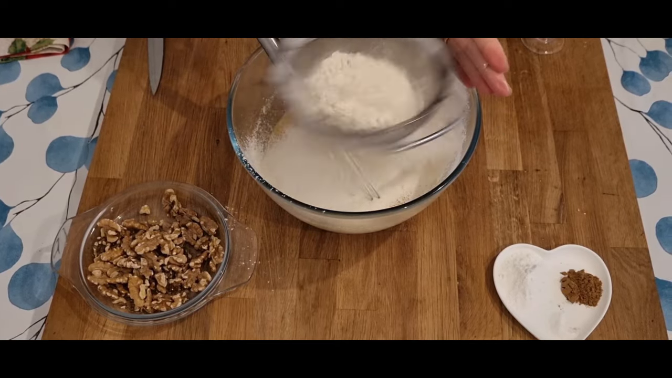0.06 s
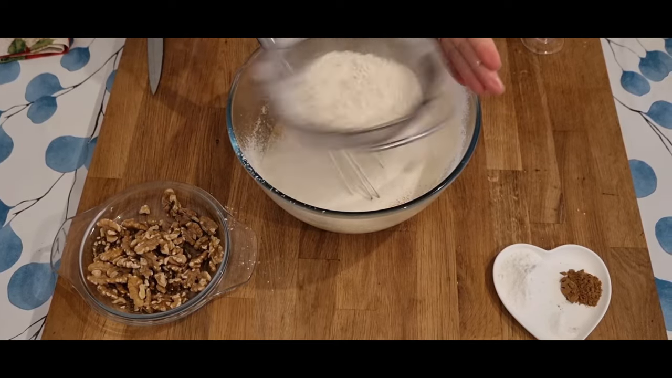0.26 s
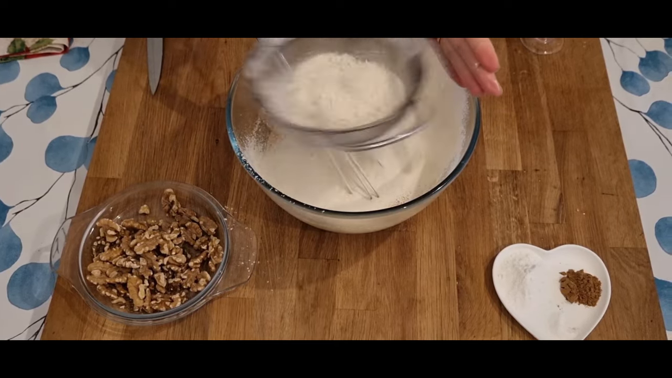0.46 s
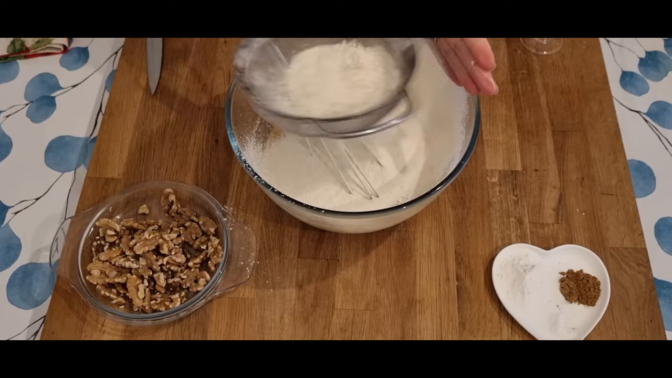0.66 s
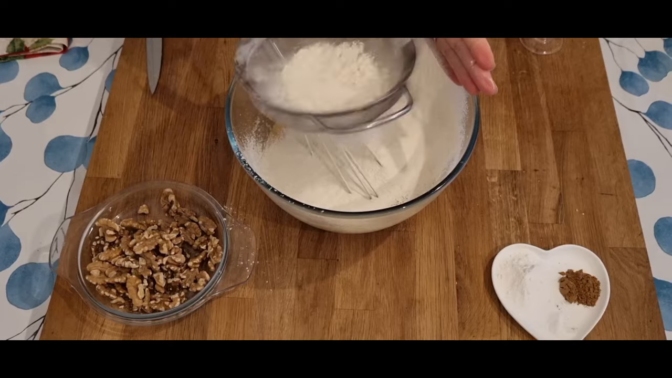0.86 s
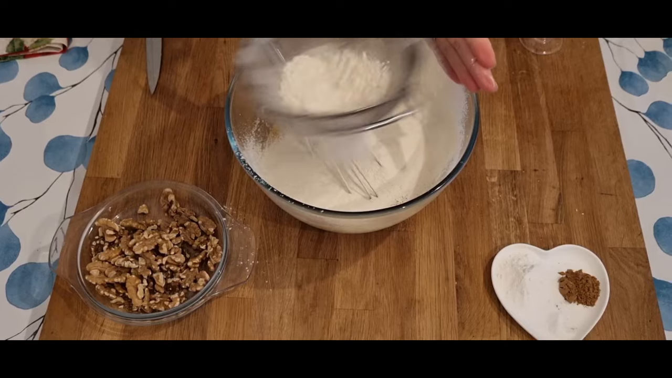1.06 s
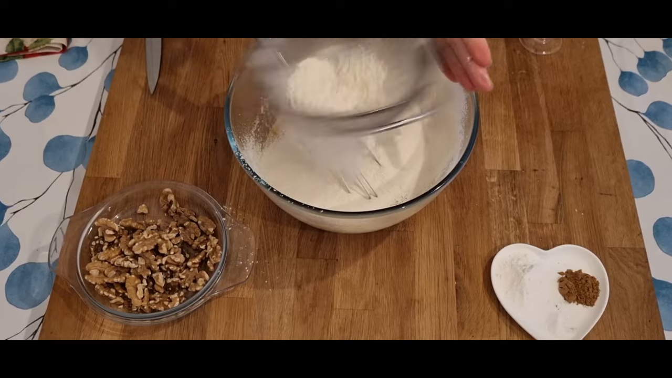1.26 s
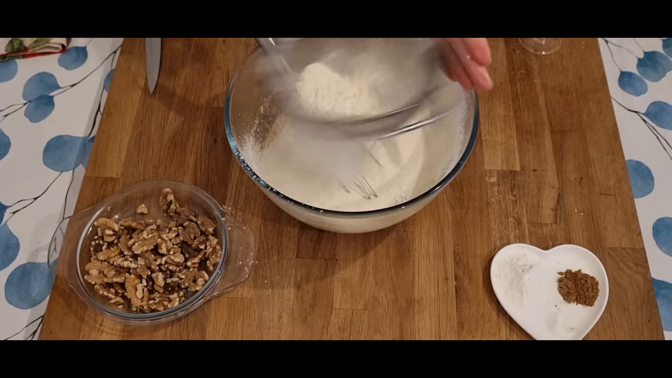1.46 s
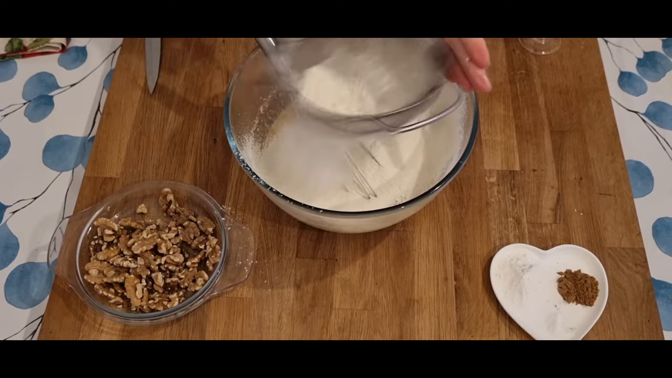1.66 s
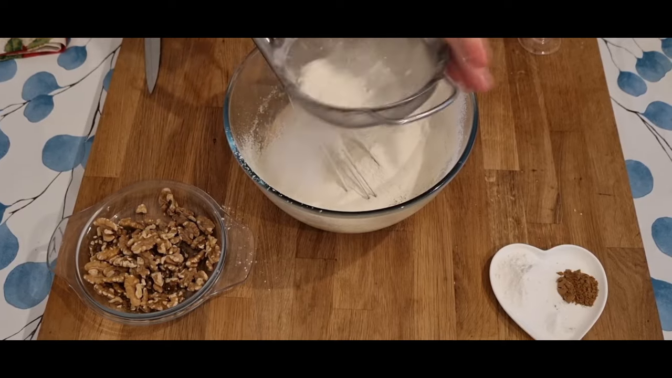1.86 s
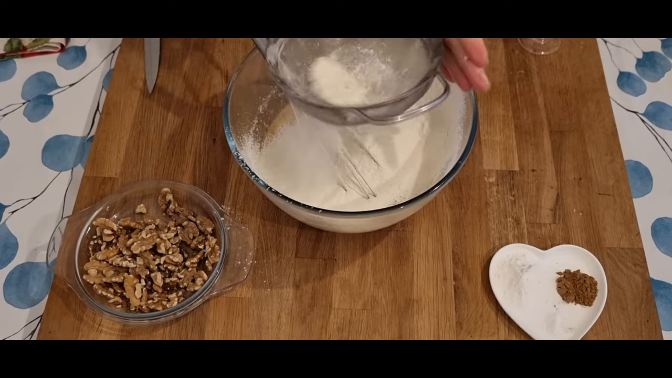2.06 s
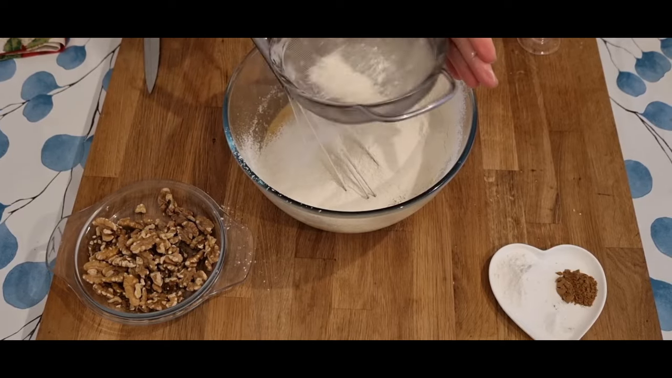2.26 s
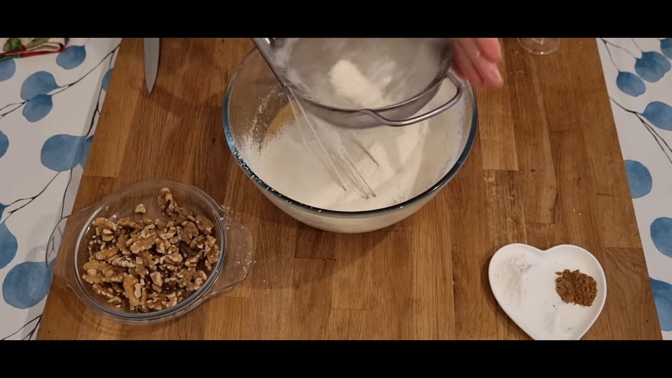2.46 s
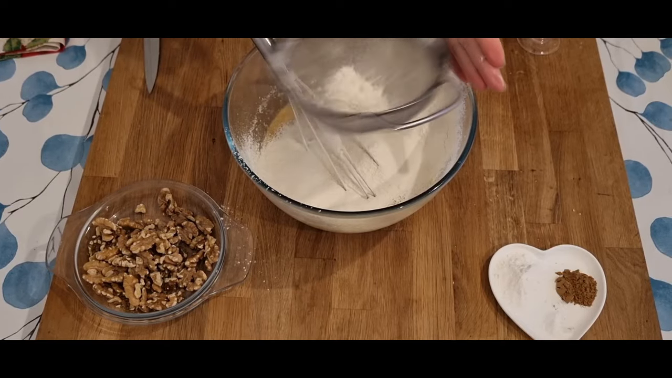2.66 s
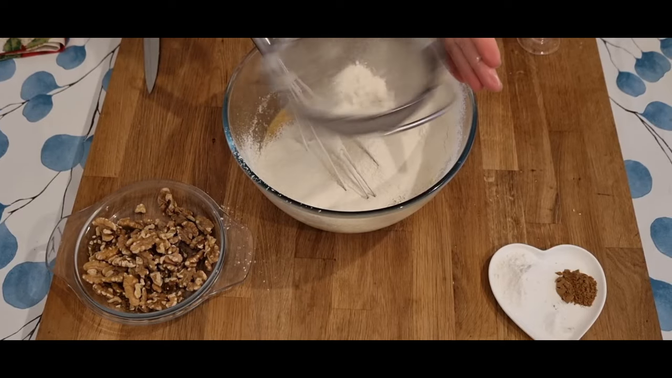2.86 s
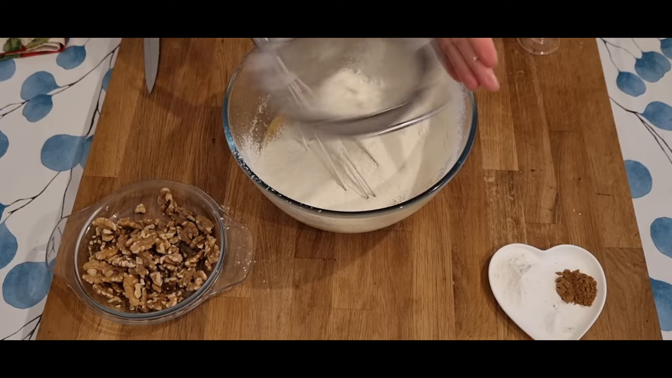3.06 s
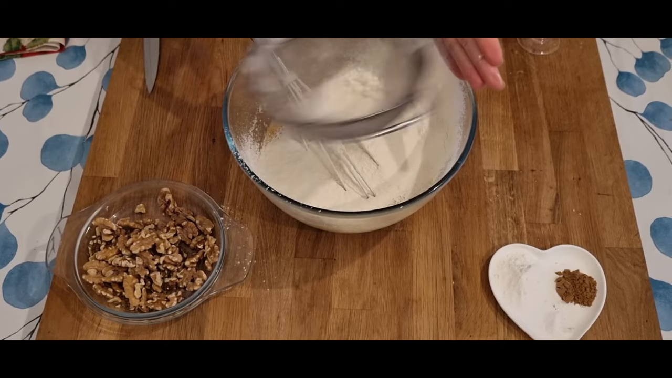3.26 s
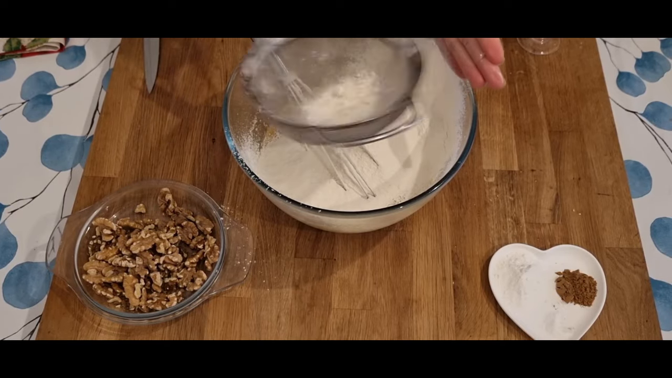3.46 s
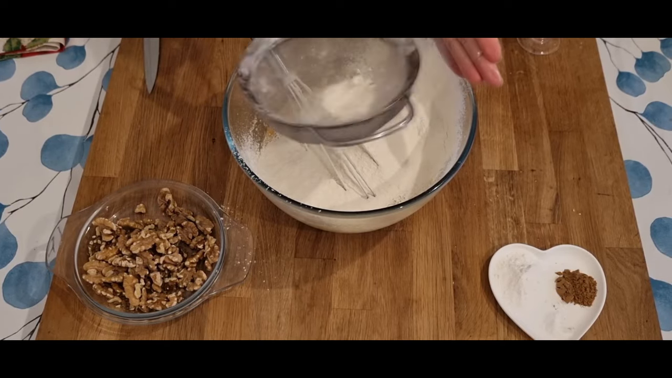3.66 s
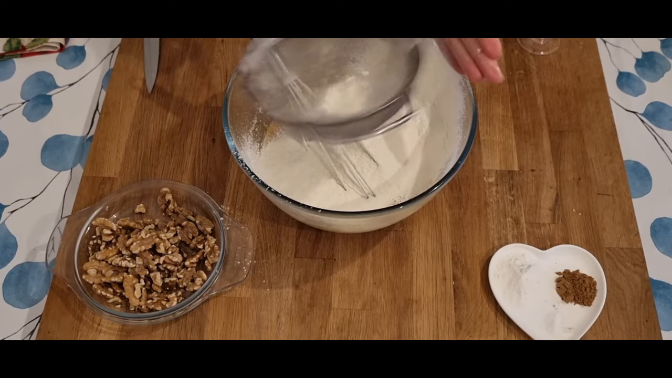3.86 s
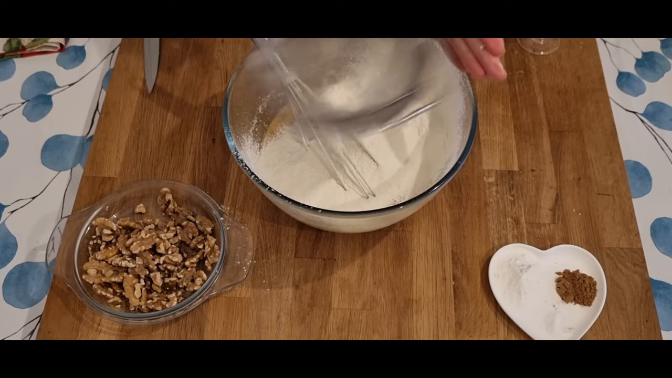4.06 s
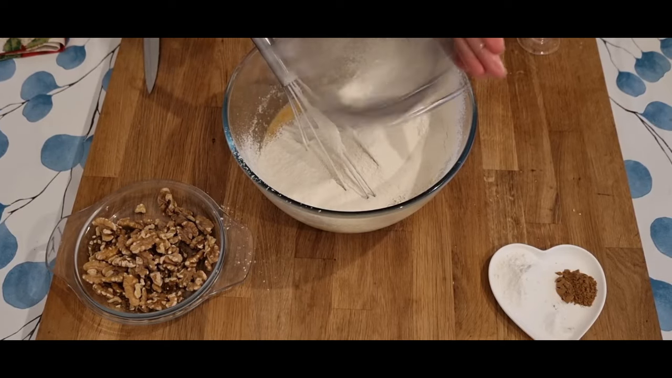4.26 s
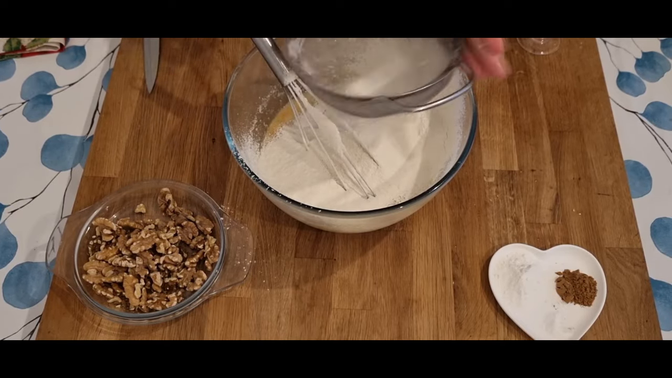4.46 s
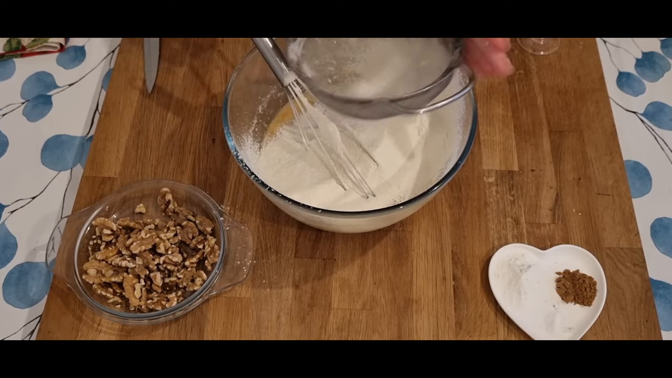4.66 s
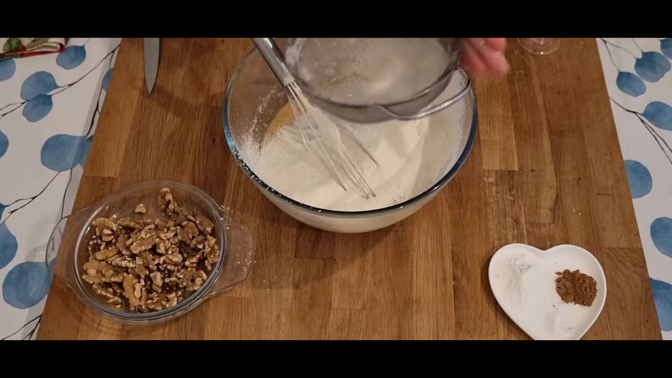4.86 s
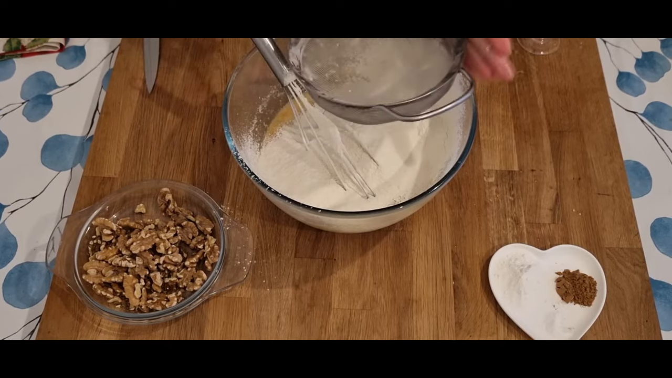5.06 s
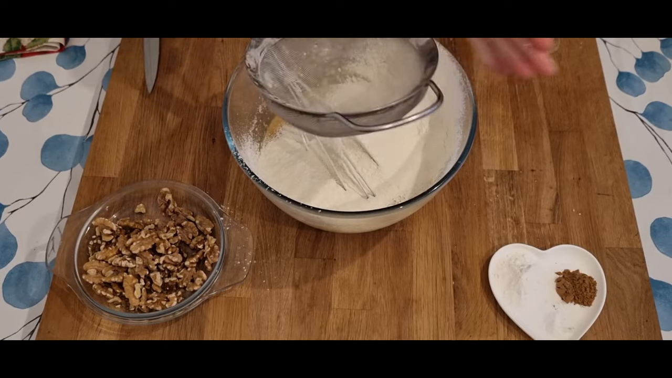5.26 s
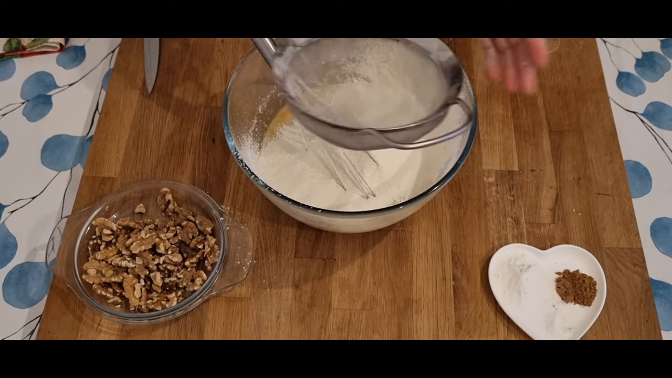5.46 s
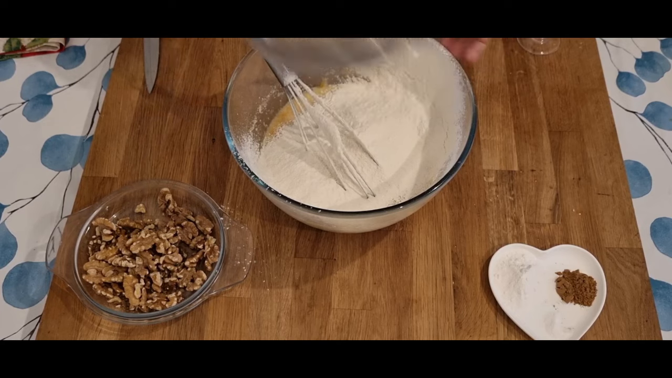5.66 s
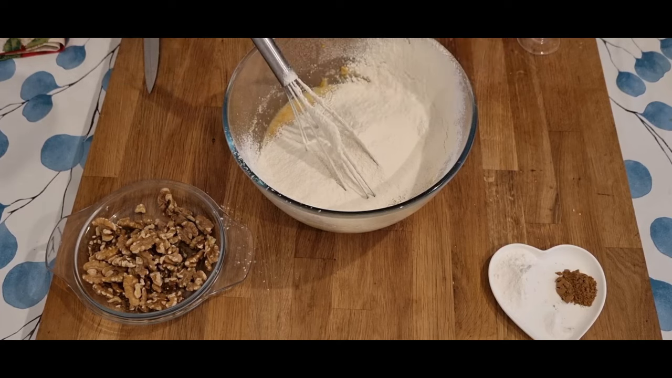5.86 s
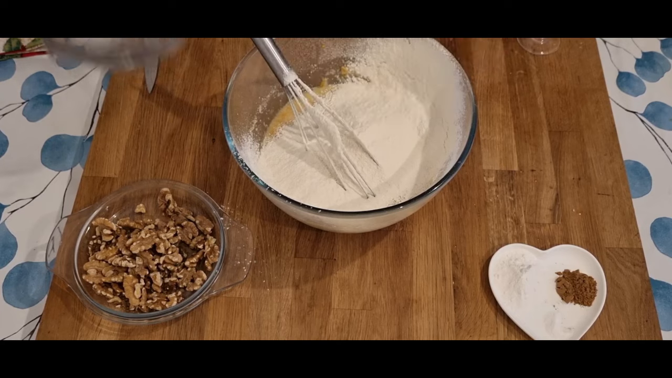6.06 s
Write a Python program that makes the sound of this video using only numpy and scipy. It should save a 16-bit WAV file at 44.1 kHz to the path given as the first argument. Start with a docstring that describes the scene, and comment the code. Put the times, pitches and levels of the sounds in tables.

```python
"""Sifting flour by hand

A metal sieve of flour is knocked against a palm above a glass bowl, in short runs of about five knocks a second.
Each knock is a few milliseconds of rim chatter, coloured by rim and mesh, with ringing modes of the wire frame.
The table throws it back after a short delay, and the kitchen rings out as noise dying band by band.
Flour hisses faintly through the mesh as grainy noise; an appliance hums in sines and whirs in narrow noise bands."""
import sys
import numpy as np
from scipy import signal
from scipy.fft import rfft, irfft
from scipy.io import wavfile
from scipy.ndimage import uniform_filter1d

SR = 44100
rng = np.random.default_rng(int(sys.argv[2]) if len(sys.argv) > 2 else 0)


def unload_wav(signal):
    """Save mono or channel-first audio to the path in sys.argv[1] as 16-bit WAV at rate SR, clipped to [-1, 1]."""
    wavfile.write(
        sys.argv[1],
        SR,
        np.round(np.clip(np.atleast_2d(signal).T, -1, 1) * 32767).astype(np.int16),
    )


N = 270093

# steady room noise: pitch_hz, level_db (per Hz)
AIR_SPECTRUM = [(20, -100), (45, -94), (65, -83.5), (120, -81.5), (170, -92), (230, -86.5), (450, -90),
                (590, -91.5), (730, -93), (830, -100), (1300, -100), (1900, -104.5), (5500, -115),
                (8000, -132)]
# how alike the room noise is on both sides: pitch_hz, likeness (1 = identical)
AIR_LIKENESS = [(50, 1), (150, 0.94), (300, 0.72), (700, 0.19), (3000, 1)]
# balance of the room noise: pitch_hz, left_over_right_db
AIR_BALANCE = [(100, -0.5), (300, -3.5), (2000, -0.5), (5000, -9)]
# narrow bands in which the appliance whirs: pitch_hz, width_hz, level_db (per Hz)
WHIR_BANDS = [(230, 7.8, -83), (581, 6.5, -81), (1520, 7, -87.5)]
# steady lines of the appliance: pitch_hz, level_db
HUM_LINES = [(60.3, -85), (90.6, -71), (100.2, -61.5), (120.8, -54), (130.4, -77), (211.4, -78.5),
             (221.0, -65.5), (251.2, -73.5), (281.4, -75), (302.0, -76), (341.8, -73), (402.2, -76.5),
             (634.4, -72.5), (663.5, -77.5), (713.5, -77)]

# tone of flour sliding over the mesh: pitch_hz, relative_level_db
FLOUR_TONE = [(500, -20), (2500, 0.5), (6500, 3), (9000, -4.5), (15000, -3.5)]
# hiss with the sieve full and nearly empty, and the time constant of the emptying
FULL_DB, EMPTY_DB, EMPTYING_S = -56.5, -87.5, 0.98
# the flour hiss starts to fade, with this time constant, before the last knocks
HISS_FADES_S, HISS_FADE_TIME_S = 4.7, .2

# the shake swings every 0.19 s; some swings miss the palm and two only brush it
# knocks: start_s, strength_db, zing_db (extra zing of the mesh)
KNOCK_TIMES = [(-0.082, -6, 11.0), (0.108, -0.5, 0.5), (0.297, -6.5, -2.5), (0.6717, -3.5, -1.5),
               (1.414, -1.5, -3.5), (1.6054, -0.5, -1.5), (1.7948, 0.5, -1), (1.982, 0.0, -2),
               (2.353, -30, 0.0), (2.5354, 0, -2), (2.7247, 1, -1.5), (2.9102, 1, -2), (3.0966, -0.5, 1.5),
               (3.4754, 0.5, -0.5), (3.6621, -2.5, 1.5), (3.848, -2, 3), (4.036, -32, -5),
               (4.2178, -0.5, -1.5), (4.401, 0.5, -2), (4.5856, -1.5, -1), (4.775, -0.5, -2),
               (4.9557, 0.0, -2.5), (5.1469, 1, -2)]
# broad resonances of rim and mesh: pitch_hz, width_hz, relative_level_db
BODY_RESONANCES = [(1370, 1330, -18.7), (1710, 340, -15.4), (2090, 430, -11.1), (2960, 380, -4.4),
                   (3490, 460, -4.3), (3860, 360, -7.2), (4530, 610, -8.3), (6010, 680, -4.6),
                   (6380, 510, -1.2), (7100, 500, -3.1), (8390, 1360, -6.8), (9400, 1640, -5.7),
                   (11230, 1670, -6.0), (12780, 1340, -6.5), (15390, 2280, -9.6)]
# long-ringing modes of the wire frame: pitch_hz, average_relative_level_db, t60_s
FRAME_MODES = [(2899, 0, .22), (3473, -2, .35), (3681, -2, .22), (3906, -3, .2), (6167, -1, .3),
               (6264, 2, .2), (6412, 0, .2), (7226, 1, .25), (8428, -3, .22), (9309, -2, .2),
               (12570, -4, .14), (12818, -3, .14)]
# how the knock reaches the two sides: pitch_hz, left_over_right_db
KNOCK_BALANCE = [(500, -2), (1800, -5), (3000, -1), (4200, -4), (6400, -4), (7400, 0), (8500, 11),
                 (10000, 5), (11500, 4), (13500, -1), (16000, 0)]
# how alike the chatter is on both sides: pitch_hz, likeness (1 = identical)
KNOCK_LIKENESS = [(500, 0.37), (3000, 0.15), (7000, 0.19), (12000, 0.065)]
# share of the knock's energy that is chatter, not one clean impact: pitch_hz, share (firm knock)
CHATTER_AMOUNT = [(500, .4), (3000, .5), (4500, .7), (6500, .8), (9000, .95), (15000, .95)]
# the table reflects the highest treble less: pitch_hz, reflection_db
TABLE_REFLECTION = [(3000, -5), (6500, -4), (9000, -7.5), (15000, -7)]
# how long the kitchen rings: pitch_hz, t60_s
KITCHEN_T60 = [(400, 0.11), (1000, 0.54), (3000, 0.3543), (6500, 0.3943), (10000, 0.28), (15000, 0.34)]
# tone of the kitchen's tail: pitch_hz, relative_level_db
KITCHEN_TONE = [(400, 10), (2000, 4), (3400, 4), (6300, 3.5), (9000, 6), (12800, 4.5), (14000, -1),
                (15500, 2.5)]

# treble gained at TREBLE_HZ per dB of strength, down to the strength of the dullest touch
BRIGHTER_DB_PER_DB, TREBLE_HZ, DULLEST_DB = 0.74, 12600, -15.5
# the zing of the mesh; a knock that zings more leans further left (dB per dB)
ZING_HZ, ZING_WIDTH_HZ, ZING_LEAN = 9000, 1800, .25
# weight that a full load of flour adds to the low end
LOAD_DB, LOAD_HZ = 9.5, 650
# left over right, before the zing leans it
PAN_DB = -.3
# a firm burst of chatter and its fade, then the rebound's delay and relative level
BURST_S, FADE_S, REBOUND_S, REBOUND_DB = .0012, .0005, .0026, -7.5
# average delay of the table's reflection, and trim of the kitchen's tail
TABLE_S, KITCHEN_DB = .0052, -2.5
# upper edge of the whole sound
EDGE_HZ = 15900


def amp(db):
    """Turns decibels into an amplitude factor."""
    return 10 ** (np.asarray(db) / 20)


def read(points, hz):
    """Joins (pitch_hz, value) points by straight lines on a log-frequency axis."""
    f, value = np.transpose(points)
    return np.interp(np.log(hz + 1), np.log(f + 1), value)


def unit(x):
    """Scales to an average energy of 1 per channel."""
    return x / np.sqrt(np.mean(np.sum(x ** 2, -1)) + 1e-20)


def sides(lean_db):
    """Left and right gains of equal total power."""
    gains = amp(np.array([lean_db, -lean_db]) / 2)
    return gains / np.sqrt(np.mean(gains ** 2, 0))


def pair(z, same):
    """Makes two unrelated spectra partly alike by sharing a mid signal."""
    same = np.clip(same, -1, 1)
    mid = np.sqrt((1 + same) / 2) * z[0]
    side = np.sqrt((1 - same) / 2) * z[1]
    return np.array([mid + side, mid - side])


def add(mix, s, sound):
    """Mixes a stereo sound in at time s; one that starts before zero loses its head."""
    start = round(s * SR)
    sound = sound[:, max(-start, 0):]
    part = mix[:, max(start, 0):][:, :sound.shape[1]]
    part += sound[:, :part.shape[1]]


def causal(gain):
    """The minimum-phase response with this gain: it rings only after the blow."""
    mirrored = np.r_[gain, gain[-2:0:-1]]
    log_gain = np.log(np.maximum(mirrored, 1e-5))
    return np.exp(np.conj(signal.hilbert(log_gain)))[:len(gain)]


def air():
    """The low, even rush of the room, with the whir of the appliance: shaped stereo noise."""
    hz = np.fft.rfftfreq(N, 1 / SR)
    rush = amp(read(AIR_SPECTRUM, hz)) ** 2
    whir = sum(amp(db) ** 2 / (1 + ((hz - f) / width) ** 2) ** 2 for f, width, db in WHIR_BANDS)
    noise = pair(rfft(rng.standard_normal((2, N))), read(AIR_LIKENESS, hz))
    z = noise * sides(read(AIR_BALANCE, hz))
    return irfft(z * np.sqrt((rush + whir) * SR / 2), N)


def appliance(waver=0.092):
    """Steady motor lines whose phase wanders slightly; the higher ones reach the two sides out of step."""
    t, out = np.arange(N) / SR, np.zeros((2, N))
    for hz, db in HUM_LINES:
        drift = np.interp(t, np.linspace(0, t[-1], 24), rng.standard_normal(24))
        lag = np.arccos(np.clip(read(AIR_LIKENESS, hz), -1, 1)) / 2  # radians between the sides
        phase = 2 * np.pi * (hz * t + rng.random()) + waver * drift + np.array([[lag], [-lag]]) / 2
        level = np.sqrt(2) * amp(db) * sides(read(AIR_BALANCE, hz))[:, None]
        out += level * np.sin(phase)
    return out


def fill(s):
    """How full the sieve is at time s: 1 at time zero, dwindling exponentially towards 0."""
    return np.exp(-s / EMPTYING_S)


def flour_flow():
    """The hiss is strongest while the sieve is full, dwindles as it empties and dies away during the last knocks."""
    t = np.arange(N) / SR
    flow = amp(EMPTY_DB + (FULL_DB - EMPTY_DB) * fill(t))
    return flow * np.exp(-np.maximum(t - HISS_FADES_S, 0) / HISS_FADE_TIME_S)


def flour():
    """Fine grains of uneven size slip through the mesh: noise whose every sample varies in strength."""
    grains = rng.standard_normal((2, N)) * amp(3 * rng.standard_normal(N))
    tone = amp(read(FLOUR_TONE, np.fft.rfftfreq(N, 1 / SR)))
    hiss = irfft(rfft(grains) * tone, N)
    return hiss / hiss.std() * flour_flow()


def chatter(t, hz, brush, brush_s=.006, buzz_db=-21, buzz_s=.004):
    """One impact, a burst of tiny contacts, a rebound and a dying buzz; a light touch (brush near 1) is drawn out."""
    def burst(u):
        return (u >= 0) * np.exp(-np.maximum(u - BURST_S - brush * brush_s, 0) / FADE_S)

    rebound = amp(REBOUND_DB) * burst(t - REBOUND_S)
    buzz = amp(buzz_db) * np.exp(-t / buzz_s)
    force = burst(t) + rebound + buzz
    noise = unit(force * rng.standard_normal((2, len(t))))
    contacts = pair(rfft(noise), read(KNOCK_LIKENESS, hz))
    share = np.clip(read(CHATTER_AMOUNT, hz) + brush, 0, 1)
    z = np.sqrt(1 - share) + np.sqrt(share) * contacts
    # the contacts are so brief that they feed all broad bands evenly
    broad = uniform_filter1d(np.mean(abs(z) ** 2, 0), size=900)
    return z * causal(broad ** -.5)


def frame_ring(t, ring_db=-11, spread_db=2.5):
    """The wire frame rings on as decaying sines, each mode struck a little differently every time."""
    f, db, t60 = np.transpose(FRAME_MODES)[:, :, None]
    strength_db = db + spread_db * rng.standard_normal(f.shape)
    modes = amp(strength_db - 60 * t / t60) * np.exp(2j * np.pi * f * t)
    start_phases = np.exp(2j * np.pi * rng.random((2, len(f))))
    return amp(ring_db) * unit((start_phases @ modes).real)


def kitchen(t, gap_s=0.0067, build_s=0.0021):
    """A diffuse tail, each band dying at its own speed; it differs at each knock as the sieve moves."""
    hz, when, z = signal.stft(rng.standard_normal((2, len(t))), SR, nperseg=256)
    rate = np.log(1000) / read(KITCHEN_T60, hz)[:, None]
    decay = np.exp(-rate * when) * np.sqrt(2 * rate / SR)  # equal energy whatever the decay time
    z = z * amp(read(KITCHEN_TONE, hz))[:, None] * decay
    tail = signal.istft(z, SR, nperseg=256)[1][:, :len(t)]
    onset = np.clip((t - gap_s) / build_s, 0, 1)
    return amp(KITCHEN_DB) * rfft(tail * onset)


def knock_colour(hz, s, strength_db, zing_db):
    """Harder knocks are brighter, a fuller sieve thuds more, and where the palm lands sets the mesh's zing."""
    treble_db = BRIGHTER_DB_PER_DB * max(strength_db, DULLEST_DB) * (hz / TREBLE_HZ) ** 2
    weight_db = LOAD_DB * fill(s) * np.exp(-(hz / LOAD_HZ) ** 2)
    mesh_db = zing_db * np.exp(-((hz - ZING_HZ) / ZING_WIDTH_HZ) ** 2)
    return amp(treble_db + weight_db + mesh_db)


def sieve(size=24576, level_db=2, direct_treble_db=0.67, firm_db=-5, brush_range_db=30,
          room_lean=0.77, thud_db=-22, thud_hz=550):
    """Each knock: chatter through the resonances of the sieve, heard directly, off the table and in the room."""
    t, hz, out = np.arange(size) / SR, np.fft.rfftfreq(size, 1 / SR), np.zeros((2, N))
    resonances = sum(amp(db) ** 2 / (1 + ((hz - f) / width) ** 2) ** 4 for f, width, db in BODY_RESONANCES)
    palm = amp(thud_db) ** 2 / (1 + (hz / thud_hz) ** 2) ** 2  # the soft blow of the palm
    power = resonances + palm
    body = np.sqrt(power / power.mean()) * hz / np.hypot(hz, 150)  # thinned below 150 Hz
    ending = np.clip(10 * (1 - t / t[-1]) - 1, 0, 1)
    lean_db = read(KNOCK_BALANCE, hz)
    for s, db, zing_db in KNOCK_TIMES:
        colour = knock_colour(hz, s, db, zing_db)
        pan_db = PAN_DB + ZING_LEAN * zing_db
        brush = np.clip((firm_db - db) / brush_range_db, 0, 1)
        # the sieve radiates differently upwards and towards the table, whose distance varies a little
        upward, downward = chatter(t, hz, brush), chatter(t, hz, brush)
        delay_s = TABLE_S * rng.uniform(.96, 1.04)
        reflected = amp(read(TABLE_REFLECTION, hz)) * downward * np.exp(-2j * np.pi * hz * delay_s)
        direct = (upward + reflected) * sides(lean_db) * amp(direct_treble_db * hz / TREBLE_HZ)
        reverb = upward * kitchen(t) * sides(room_lean * lean_db)
        struck = (direct + reverb) * causal(body * colour)
        ringing = rfft(frame_ring(t)) * causal(colour)
        knock = irfft(struck + ringing)
        add(out, s, amp(db + level_db) * sides(pan_db)[:, None] * knock * ending)
    return out


def scene():
    """Sieve and flour over the sound of the room."""
    return air() + appliance() + flour() + sieve()


def record(dry):
    """The recorder's band limit: a steep low-pass at EDGE_HZ."""
    lowpass = signal.firwin(511, EDGE_HZ, window=("kaiser", 9), fs=SR)
    return signal.oaconvolve(dry, lowpass[None], "same")


dry = scene()
out = record(dry)
unload_wav(out)
```